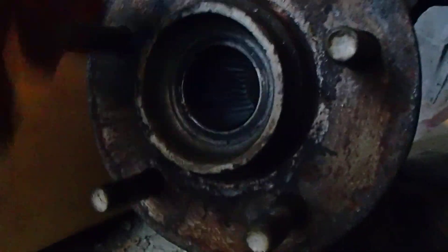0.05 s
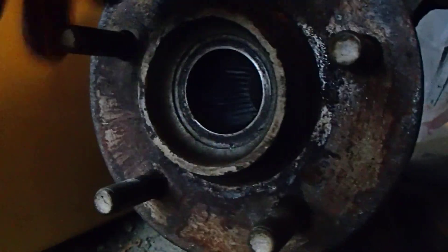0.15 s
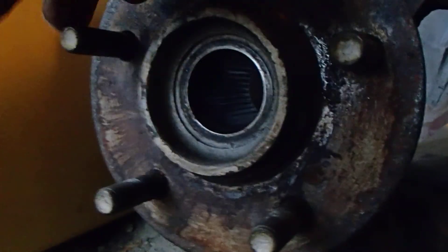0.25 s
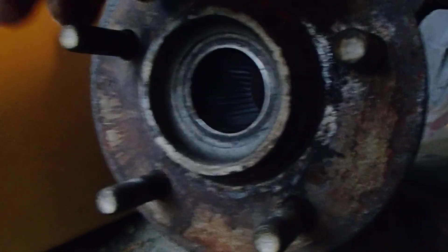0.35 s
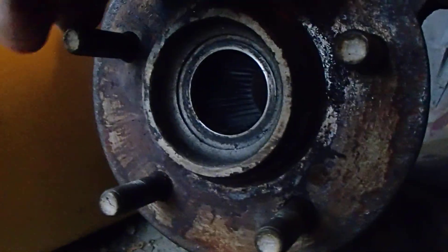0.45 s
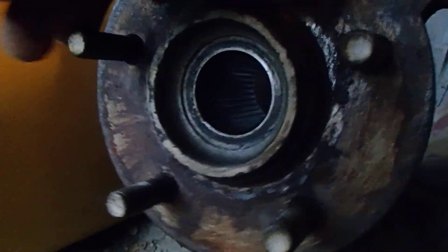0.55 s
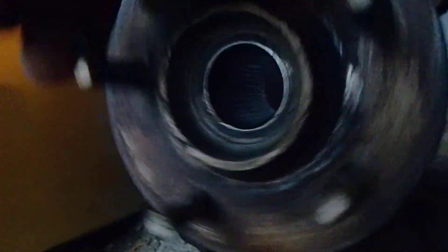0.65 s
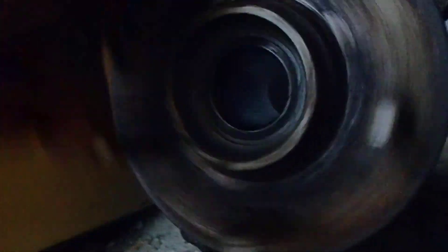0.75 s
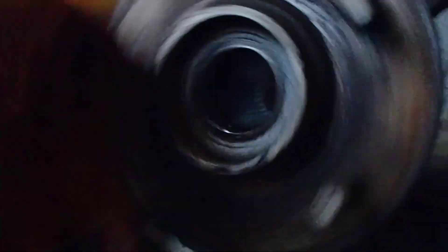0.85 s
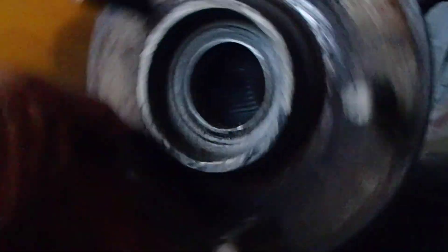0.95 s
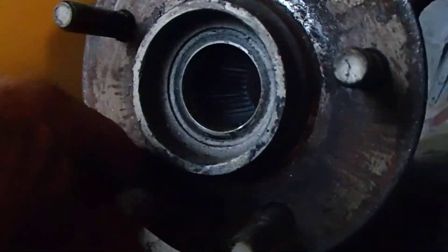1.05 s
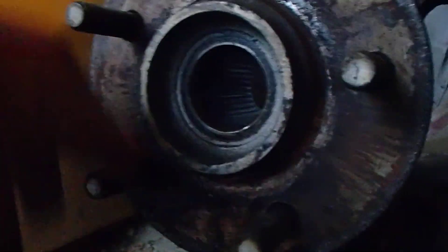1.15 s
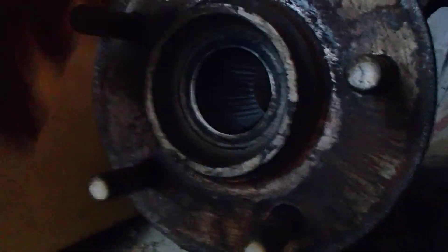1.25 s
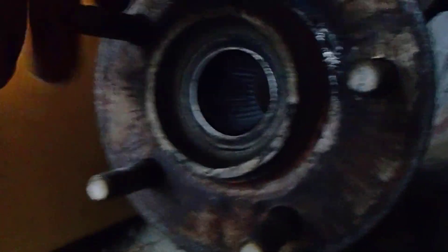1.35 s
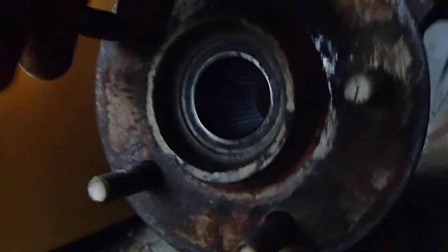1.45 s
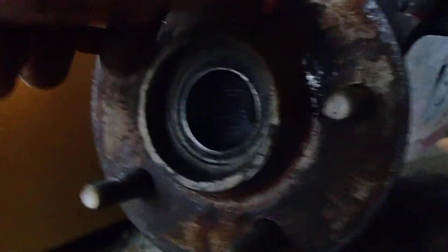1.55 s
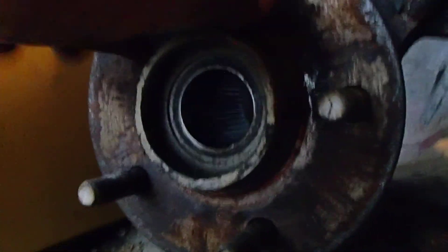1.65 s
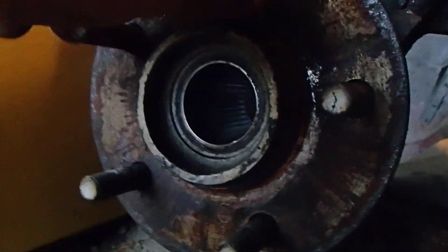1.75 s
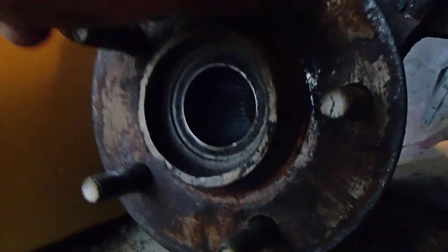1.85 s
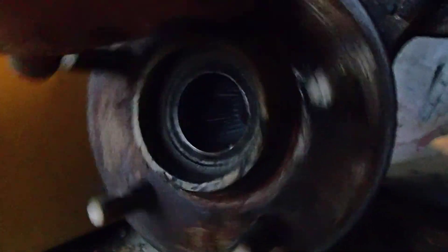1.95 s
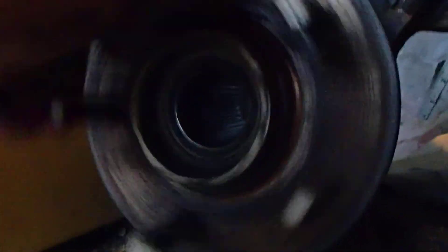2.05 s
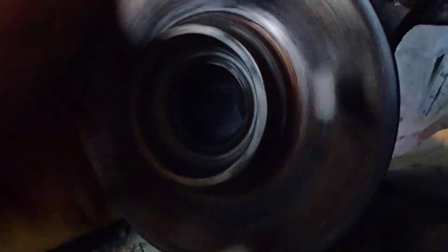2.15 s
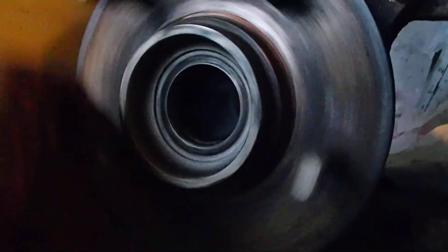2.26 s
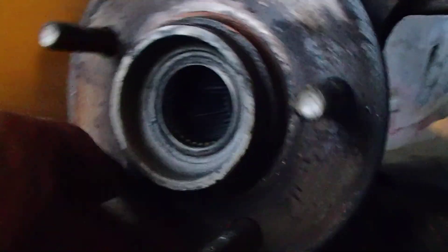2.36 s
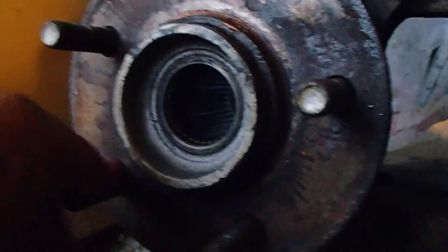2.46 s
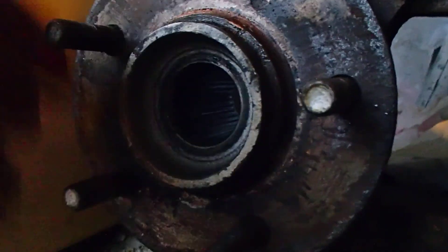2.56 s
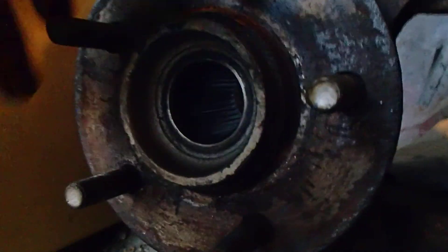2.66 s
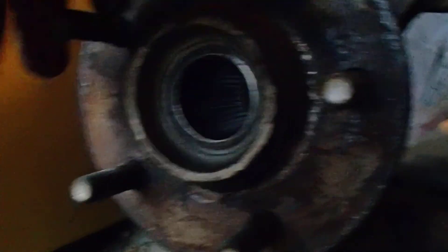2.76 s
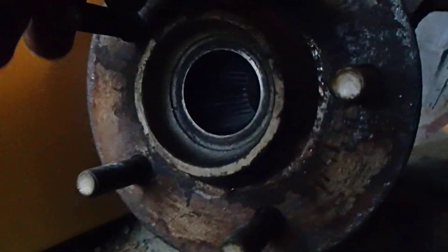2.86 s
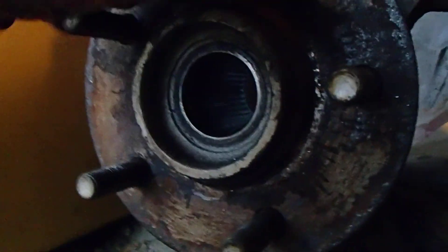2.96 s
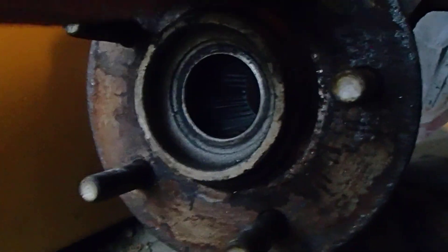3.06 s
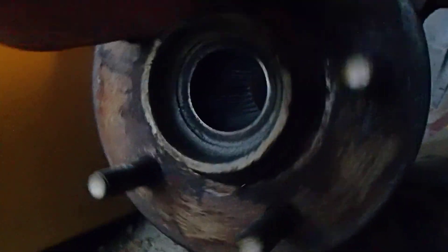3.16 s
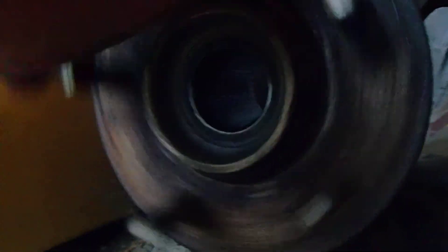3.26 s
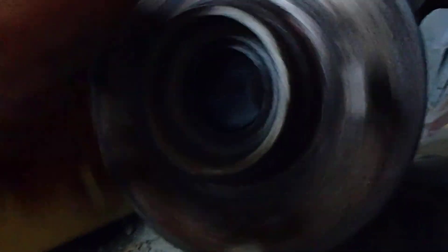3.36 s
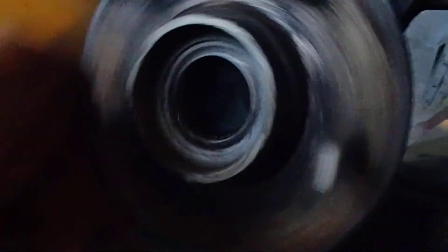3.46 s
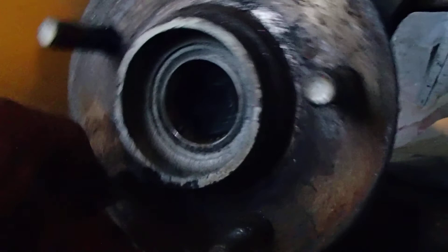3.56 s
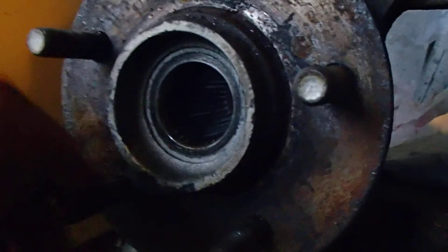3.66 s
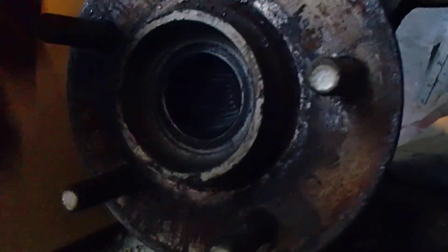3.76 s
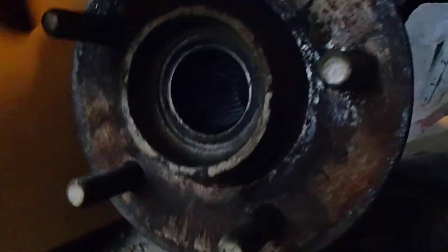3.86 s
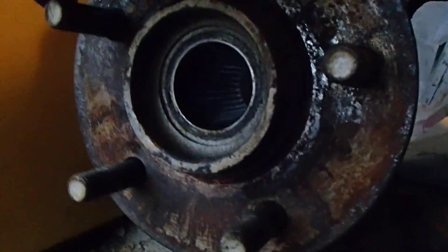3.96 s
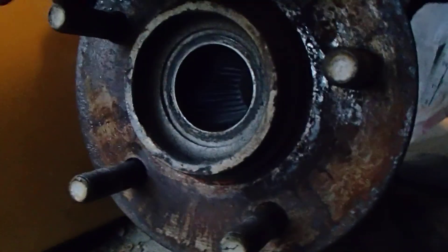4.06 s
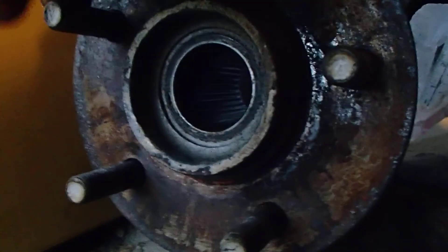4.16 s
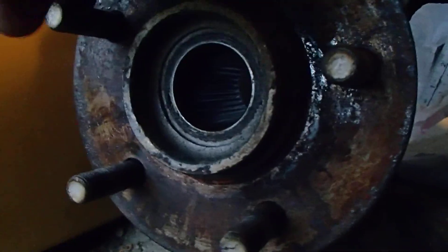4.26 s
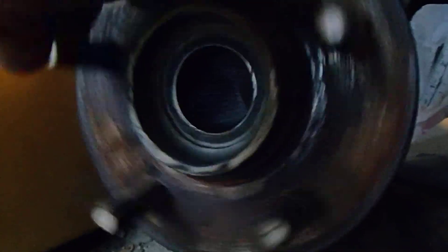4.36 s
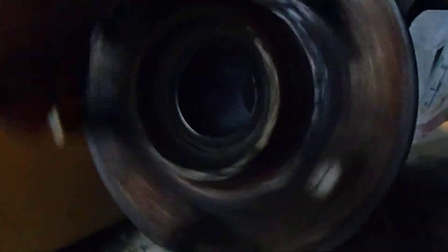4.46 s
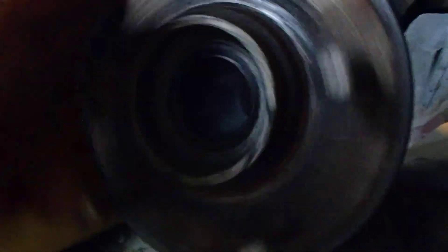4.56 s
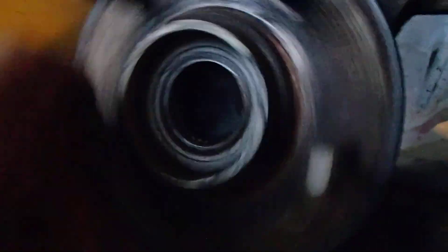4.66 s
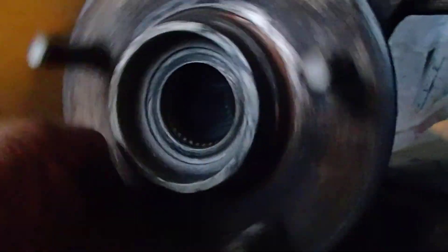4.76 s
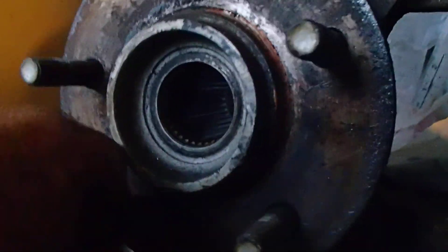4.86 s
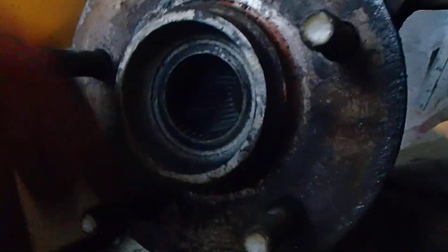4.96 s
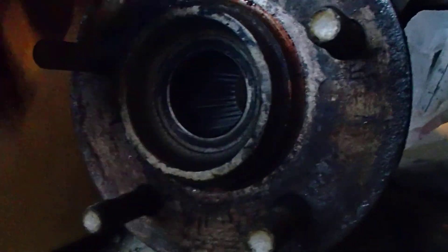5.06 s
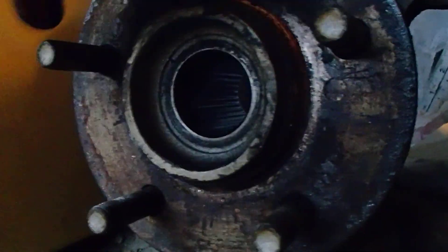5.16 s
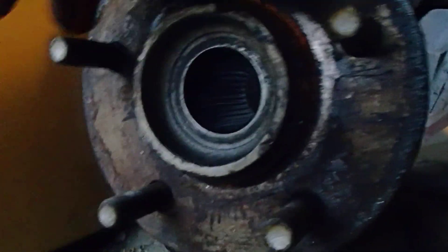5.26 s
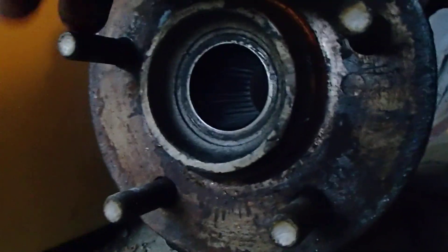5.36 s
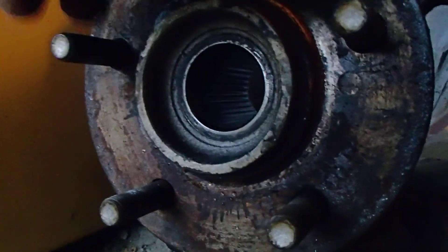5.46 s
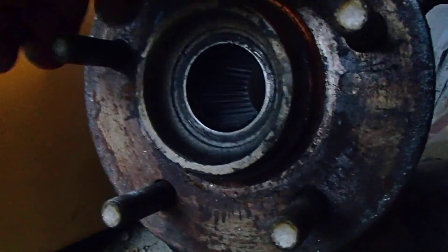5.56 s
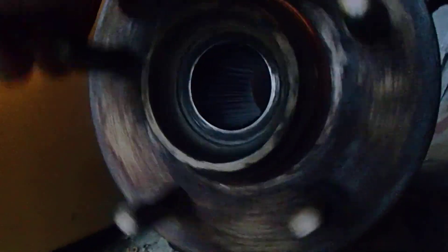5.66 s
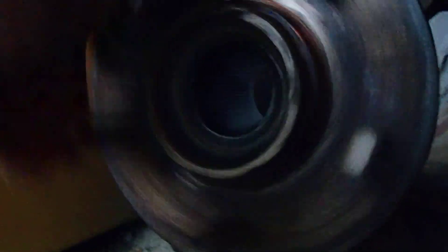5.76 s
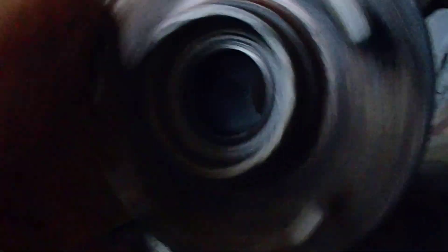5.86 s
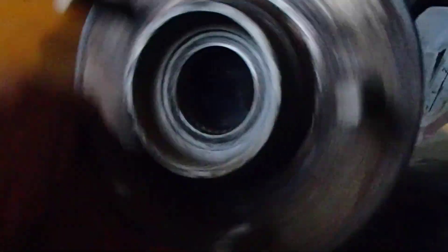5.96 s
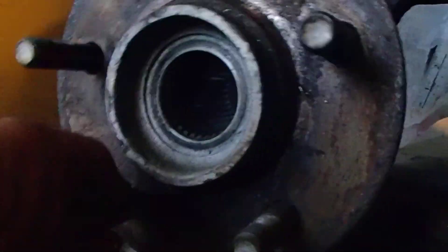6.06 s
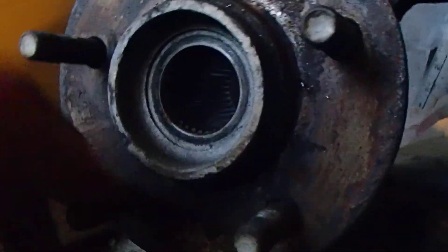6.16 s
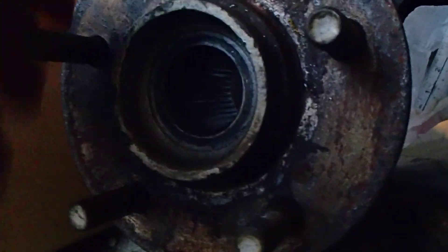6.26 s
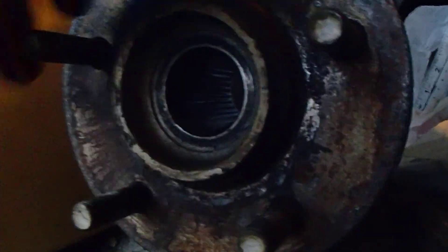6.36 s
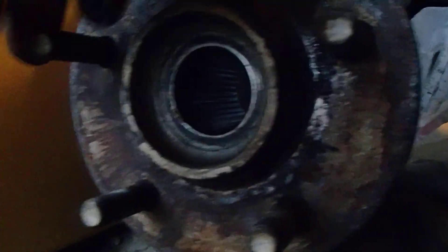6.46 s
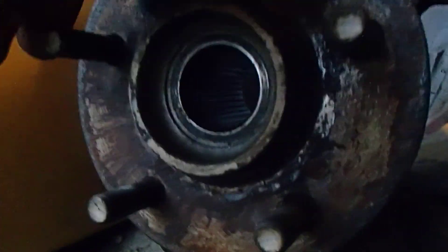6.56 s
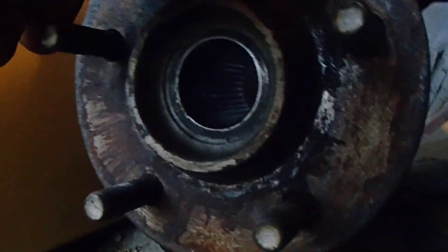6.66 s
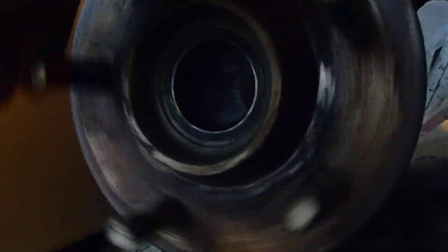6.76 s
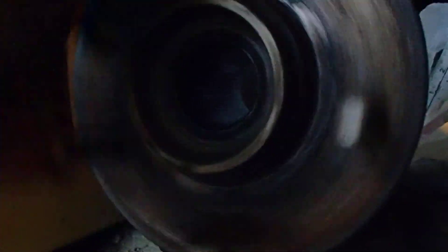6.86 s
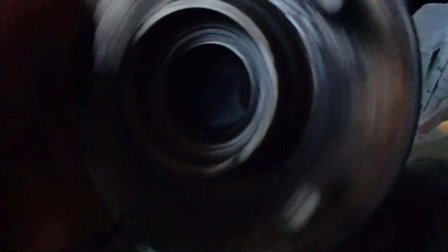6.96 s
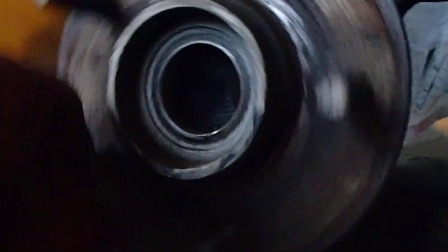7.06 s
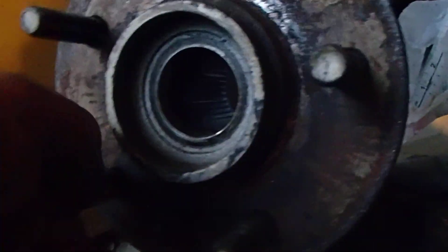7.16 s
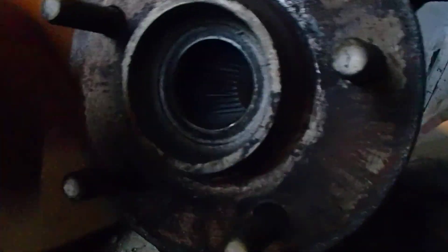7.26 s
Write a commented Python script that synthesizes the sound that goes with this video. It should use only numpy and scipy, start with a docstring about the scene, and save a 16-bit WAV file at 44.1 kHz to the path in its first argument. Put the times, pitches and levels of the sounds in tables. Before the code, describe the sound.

Sharp, uneven metallic clicks come in pairs, heard up close, as a worn wheel bearing is pushed round by hand six times. A low, gritty rolling sound runs under each push, and the clicks carry slight squeaks and leave the steel rim ringing briefly. Faint pings, dry brushing, a few soft knocks and two tiny late ticks are scattered through, over the steady hiss of a quiet room.

```python
"""A quiet room hisses, and close by the steel rim (flange) of a worn wheel hub sings faintly and pings.
Then a hand turns the hub in six short pushes, and its dry bearing rumbles and rustles.
In each push the balls catch twice on their pitted track: jolts chatter through the steel housing,
the slipping ball squeaks, and the flange rings on. The hub settles with soft pings.
Along the way come light brushing on rust, a few dull knocks and, late on, two ticks of a loose ball."""
import sys
import numpy as np
from scipy import signal
from scipy.fft import rfft, irfft, next_fast_len
from scipy.io import wavfile

SR = 44100
rng = np.random.default_rng(int(sys.argv[2]) if len(sys.argv) > 2 else 0)


def to_wav(sig):
    """Store sig (one row per channel, or 1-D mono) as 16-bit WAV at the path in sys.argv[1].

    Samples outside -1..1 are clipped; the rate is SR.
    """
    pcm = np.clip(np.atleast_2d(sig), -1, 1) * 32767
    pcm = np.round(pcm).astype(np.int16)
    wavfile.write(sys.argv[1], SR, pcm.T)  # frames by channels


N = 322371
TIME = np.arange(N) / SR

# Tone colour of the room's hiss: f/Hz, relative level/dB
HISS_SPECTRUM = [(20, -11.5), (60, -13.5), (130, -7.5), (230, -9.5), (340, -6), (490, -10), (620, -3),
                 (900, -2), (1350, -2.5), (1650, -5), (2100, -3), (2600, -6), (4200, -8), (4550, -13.5),
                 (6600, -20), (7300, -23), (9500, -24), (15000, -27)]
# The flange's modes (the notes it rings at), with a close pair that beats: f/Hz
FLANGE_PITCHES = [3316, 4159, 4172, 4737, 5546, 6602, 8205, 10146, 11150]
# For each of those modes: relative level/dB, free ring time/s (to fade by 60 dB)
FLANGE_MODES = [(4, 0.36), (1.5, 0.46), (-4, .55), (-20, .35), (5.5, 0.29), (2.5, 0.3), (-8, 0.49),
                (-7, 0.31), (-21, .3)]
# For each mode: its group (0-3), which picks one of the four levels of a strike
MODE_GROUPS = [0, 1, 1, 1, 2, 3, 3, 3, 3]
# Pings as the hub settles: t/s, level/dB for each of the four groups, ring time factor
SETTLING_PINGS = [(.104, -51, -47, -60, -63, .68), (.402, -47, -56, -55, -49, .47),
                  (.825, -38.5, -48, -53, -52, .54), (1.151, -54, -40.5, -47, -49, .7),
                  (1.526, -43, -46, -50, -49, .78), (3.675, -36.5, -30, -51, -51, .8),
                  (4.899, -42, -39, -48, -49, .7), (5.467, -60, -50, -58, -51, .38),
                  (6.068, -55, -49, -57, -61, 1.2), (7.136, -49, -59, -50, -62, .56)]
# Rumble of each push: level/dB
PUSH_LEVELS = [-51, -55, -47, -47.5, -47.5, -52.5]
# Tone colours of the bearing's rumble and of its gritty rustle: f/Hz, relative level/dB
RUMBLE_SPECTRUM = [(25, -45), (130, -12), (450, -20), (700, -1.5), (900, 4), (1150, 0), (1700, -4),
                   (3500, -11), (8000, -35)]
GRIT_SPECTRUM = [(1500, 5), (3400, 7), (4600, -7), (6400, -5.5), (8500, -15.5), (15000, -18)]
# A ball catches in a pit, twice a push: start t/s, far edge t/s, end t/s, drop level/dB,
# chatter level/dB, far edge level/dB, brightness/(dB per octave), pitch factor, squeak level/dB,
# ring level/dB for groups 0, 2 and 3, ring time factor. The levels are relative.
PIT_CATCHES = [(.692, .7115, .716, -11, -12.5, -8, -.5, .997, -5.5, -20.5, -38, -42, .44),
               (.880, .906, .912, -31, -25.5, -22, -2, 1.01, -2.5, -42, -50, -54, .3),
               (2.0583, 2.072, 2.079, -4.5, -19.5, -15.5, -.5, 1.008, 0, -24, -52, -39, .43),
               (2.2378, 2.2555, 2.274, -22, -24, -20, -2, 1.018, -.5, -33, -58, -56, .17),
               (3.2705, 3.2815, 3.286, -11, -15.5, -8, 0, 1.003, 2, -33.5, -47, -44, .33),
               (3.4275, 3.4513, 3.464, -15, -20, -15.5, -5, 1.022, -2, -17, -41, -39, .22),
               (4.4507, 4.463, 4.469, -15, -15.5, -10, -1.5, 1.003, -4.5, -23.5, -50, -44, .53),
               (4.6305, 4.6515, 4.657, -6.5, -13.5, -9.5, -.5, 1.004, -4, -21, -46, -41, .19),
               (5.7232, 5.7305, 5.74, -16, -15.5, -6.5, -1.5, .995, -3, -30, -42, -45, .4),
               (5.8845, 5.8985, 5.904, -14, -13.5, -10.5, .5, .99, -4.5, -33, -42, -41, .38),
               (6.8045, 6.821, 6.829, -15, -11.5, -5.5, -.5, .982, -5, -37, -41, -32, .39),
               (6.9815, 7.003, 7.009, -24, -23, -11.5, -2, 1.002, -5.5, -25, -41, -38, .21)]
# Quickly fading modes of the housing: f/Hz, width/Hz, relative level/dB
HOUSING_MODES = [(2100, 350, -21), (2494, 86, -10.5), (2820, 314, -9), (3015, 173, -6.5), (3302, 82, -2),
                 (3670, 320, -10), (3906, 134, -6.5), (5023, 330, -10), (5364, 210, -7.5), (6185, 150, -4),
                 (6340, 325, -5), (6845, 260, -11), (7390, 180, -13), (7646, 170, -14), (8050, 110, -18),
                 (9100, 220, -24.5), (9500, 130, -28), (10240, 210, -25.5), (10900, 300, -37),
                 (11450, 160, -34), (13300, 500, -43)]
# Hollows between the housing's clusters of modes: f/Hz, width/Hz, level/dB
HOUSING_DIPS = [(4480, 540, -8.5), (5900, 280, -10), (8470, 350, -5)]
# Notes that a sticking and slipping ball excites: f/Hz, relative level/dB, wander/Hz
SQUEAK_MODES = [(3535, -2, 58), (6150, -12, 80)]
# Light, dry brushing on the rusty steel: start t/s, end t/s, level/dB
BRUSH_STROKES = [(.788, .882, -52), (1.51, 1.572, -56), (3.54, 3.602, -55), (4.79, 4.945, -56),
                 (5.455, 5.476, -50), (6.027, 6.094, -57), (6.992, 7.19, -56)]
# Tone colour of the brushing: f/Hz, relative level/dB
BRUSH_SPECTRUM = [(2000, -16), (6000, 5), (9000, -8), (14000, -2), (16000, -6)]
# Dull knocks of the hub: t/s, relative level/dB, fade time/s
HUB_KNOCKS = [(1.675, -41, 0.023), (2.058, -43, 0.0079), (3.3245, -37.5, 0.0054), (5.868, -36, 0.0083),
              (6.816, -45, 0.04)]
# Tone colour of the knocks: f/Hz, relative level/dB
KNOCK_SPECTRUM = [(25, -40), (150, -14), (500, -13), (850, 0.5), (1100, -0.5), (1500, -9.5), (3500, -3.5),
                  (6500, -20), (11000, -40)]
# Stray ticks of a loose ball: t/s, level/dB
BALL_TICKS = [(4.590, -34), (6.931, -46)]


def from_db(db):
    """Turn decibels into a factor to multiply by."""
    return 10 ** (np.asarray(db) / 20)


def add(out, s, sound):
    """Mix a sound in, starting at s seconds."""
    at = int(round(s * SR))
    out[at:at + len(sound)] += sound[:N - at]


def coloured(x, spectrum):
    """Give a signal a tone colour, then scale it to a typical size (rms) of 1."""
    hz, db = np.transpose(spectrum)
    size = next_fast_len(N)
    log_hz = np.log(np.maximum(np.fft.rfftfreq(size, 1 / SR), 1))
    gain = from_db(np.interp(log_hz, np.log(hz), db))
    shaped = irfft(rfft(x, size) * gain, size)[:N]
    return shaped / np.std(shaped)


def grains(size, per_s, spread_db):
    """Tiny random clicks of uneven strength, scaled to an rms of 1."""
    clicks = (rng.random(size) < per_s / SR) * rng.standard_normal(size)
    clicks *= from_db(spread_db * rng.standard_normal(size))
    return clicks / (np.std(clicks) + 1e-12)


def drift(size, rate):
    """A value that glides to a new random number rate times a second."""
    steps = np.arange(size) * rate / SR
    targets = rng.standard_normal(int(steps[-1]) + 2)
    return np.interp(steps, np.arange(len(targets)), targets)


def resonate(x, hz, width):
    """Let a signal ring at one pitch, with a gain of 1 at that pitch."""
    r = np.exp(-np.pi * width / SR)
    feedback = [1, -2 * r * np.cos(2 * np.pi * hz / SR), r * r]
    return signal.lfilter(np.array([1, 0, -1]) * (1 - r * r) / 2, feedback, x)


def stroke(start, end):
    """A movement that speeds up and slows down again."""
    return np.sin(np.pi * np.clip((TIME - start) / (end - start), 0, 1))


def pushes():
    """Start times of the first and second catch of each push."""
    starts = [row[0] for row in PIT_CATCHES]
    return list(zip(starts[::2], starts[1::2]))


def room_hiss(level_db=-46):
    """The room hisses evenly throughout."""
    return from_db(level_db) * coloured(rng.standard_normal(N), HISS_SPECTRUM)


def singing(steady_db=-62, swell_db=-58, fade_s=.4, width_hz=14, mode_db=(-6, -6, -15, -24, -14)):
    """Tiny contacts keep the lower flange modes just sounding, most as the hub coasts after a push."""
    contacts, out = grains(N, per_s=150, spread_db=3.5), 0
    for hz, db in zip(FLANGE_PITCHES, mode_db):
        mode = resonate(contacts + 1e-18, hz, width_hz)
        out += from_db(db) * mode / np.std(mode)
    coasting = sum((TIME > second) * np.exp(-np.abs(TIME - second) / fade_s) for _, second in pushes())
    return out * (from_db(steady_db) + from_db(swell_db) * coasting)


def flange_ring(strike_db, ring_factor, rise_s, top_hz, detune_hz=4):
    """Pure notes whose balance depends on where the ball strikes; the hand can shorten the ring."""
    out, t = 0, TIME[:SR // 2]
    shift_hz = detune_hz * rng.standard_normal()   # the load on the hub pulls the pitch a little
    for hz, group, (db, ring_s) in zip(FLANGE_PITCHES, MODE_GROUPS, FLANGE_MODES):
        gain = from_db(db + strike_db[group]) / (1 + (hz / top_hz) ** 8)
        fade = np.exp(-np.log(1000) * t / (ring_s * ring_factor))
        out += gain * fade * np.sin(2 * np.pi * (hz + shift_hz) * t)
    return out * (1 - np.exp(-t / rise_s))


def pings():
    """The hub settles and the flange pings, with a gentle start and a mellow tone."""
    out = np.zeros(N)
    for s, *strike_db, ring_factor in SETTLING_PINGS:
        add(out, s, flange_ring(strike_db, ring_factor, rise_s=.005, top_hz=9800))
    return out


def room_echo(x, echo_db=-23, fade_60db_s=.17, gap_s=.0045):
    """The room adds a faint, short wash of echoes."""
    t = TIME[:SR // 3]
    echoes = rng.standard_normal(len(t)) * np.exp(-np.log(1000) * t / fade_60db_s) * (t > gap_s)
    return x + from_db(echo_db) * signal.fftconvolve(x, echoes / np.linalg.norm(echoes))[:N]


def rolling(uneven_db=2, grit_db=-52.5, lead_s=.08, coast_s=.11):
    """During each push the balls rumble and rustle along their dry track."""
    bumps = grains(N, per_s=900, spread_db=2) * from_db(uneven_db * drift(N, rate=70))
    rumble = coloured(bumps, RUMBLE_SPECTRUM)
    rustle = from_db(grit_db) * coloured(grains(N, per_s=7000, spread_db=6.5), GRIT_SPECTRUM)
    return sum(stroke(first - lead_s, second + coast_s) * (from_db(db) * rumble + rustle)
               for (first, second), db in zip(pushes(), PUSH_LEVELS))


def catches(grind_db=6, drag_db=-10, ramp_s=.00051, drop_s=.0022, lesser_db=-2, clear_s=.002,
            jolt_db=27, crush_db=-11, crush_s=.0009, skid_rise_s=.00088, skid_s=.0023):
    """A grinding ball drops into a pit, chatters across it and strikes the far edge."""
    out, t = np.zeros(N), TIME[:SR // 10]
    for start, edge, end, drop_db, chatter_db, edge_db, bright_db, pitch, squeak_db, *_ in PIT_CATCHES:
        contact = from_db(chatter_db) * np.clip(np.minimum(t, end - start - t) / ramp_s, 0, 1)
        force = from_db(grind_db) * contact * grains(len(t), per_s=9000, spread_db=3.5)
        slip = from_db(drag_db) * contact
        grit = rng.standard_normal(len(t))
        jolts = [(drop_s, drop_db), (edge - start, edge_db)]
        jolts += chatter(drop_s, end - start - clear_s, chatter_db + lesser_db)
        for s, db in jolts:
            at = int(round(s * SR))
            after = t[:len(t) - at]
            # a jolt is one sharp blow that crushes some grit and lets the ball skid
            blow = from_db(crush_db) * grit[at:] * np.exp(-after / crush_s)
            blow[0] = 1
            force[at:] += from_db(db + jolt_db) * blow
            slip[at:] += from_db(db) * 2 * (1 - np.exp(-after / skid_rise_s)) * np.exp(-after / skid_s)
        add(out, start, housing(force, bright_db, pitch) + from_db(squeak_db) * squeak(slip, pitch))
    return out


def housing(force, bright_db, pitch, crack_db=-47):
    """Thick steel answers a blow with a bare crack and notes that die quickly."""
    sound = from_db(crack_db) * force
    for k, (hz, width, db) in enumerate(HOUSING_MODES):
        gain = from_db(db + bright_db * np.log2(hz / 3500))
        sound += (-1) ** k * gain * resonate(force, hz * pitch, width)
    for hz, width, db in HOUSING_DIPS:
        sound -= (1 - from_db(db)) * resonate(sound, hz * pitch, width)
    return sound


def squeak(slip, pitch):
    """Rubbing drives two unsteady notes for as long as the ball slips."""
    out = 0
    for hz, db, wander_hz in SQUEAK_MODES:
        unsteady_hz = hz * pitch + wander_hz * drift(len(slip), rate=500)
        out += from_db(db) * np.sin(2 * np.pi * np.cumsum(unsteady_hz) / SR)
    return slip * out


def chatter(from_s, until_s, db, gap_s=.004, jitter=.3, spread_db=1.5, count=14):
    """Small, unevenly spaced jolts as the ball crosses the pit: a list of t/s, level/dB."""
    times = from_s + np.cumsum(gap_s * np.exp(jitter * rng.standard_normal(count)))
    levels = db + spread_db * rng.standard_normal(count)
    return [(s, level) for s, level in zip(times, levels) if s < until_s]


def edge_rings(group1_db=-49):
    """Hitting a pit's far edge sets the flange ringing, but barely stirs mode group 1."""
    out = np.zeros(N)
    for _, edge, *_, group0_db, group2_db, group3_db, ring_factor in PIT_CATCHES:
        strike_db = (group0_db, group1_db, group2_db, group3_db)
        add(out, edge, flange_ring(strike_db, ring_factor, rise_s=.002, top_hz=14000))
    return out


def brushing(scuff_s=.032, scuff_db=-50):
    """Fine rust rustles under a light touch, and scuffs just before each push's second catch."""
    rust = coloured(grains(N, per_s=4000, spread_db=2), BRUSH_SPECTRUM)
    scuffs = from_db(scuff_db) * sum(stroke(second - scuff_s, second) for _, second in pushes())
    touches = sum(from_db(db) * stroke(start, end) for start, end, db in BRUSH_STROKES)
    return rust * (scuffs + touches)


def knocks(rise_s=.0014):
    """The hub knocks softly under the hand, in short, dull bursts of noise."""
    level, t = np.zeros(N), TIME[:SR // 5]
    for s, db, fade_s in HUB_KNOCKS:
        add(level, s, from_db(db) * 2 * (1 - np.exp(-t / rise_s)) * np.exp(-t / fade_s))
    return level * coloured(rng.standard_normal(N), KNOCK_SPECTRUM)


def ticks(hz=6250, peak_s=.0007):
    """A loose ball taps out one high, very short note."""
    out, t = np.zeros(N), TIME[:SR // 50]
    tick = t / peak_s * np.exp(1 - t / peak_s) * np.sin(2 * np.pi * hz * t)
    for s, db in BALL_TICKS:
        add(out, s, from_db(db) * tick)
    return out


def scene():
    """The hub heard close by, in one channel; only the struck sounds echo."""
    struck = room_echo(catches() + edge_rings() + pings() + ticks())
    return (struck + singing() + rolling() + brushing() + knocks() + room_hiss())[None]


def record(dry, cutoff_hz=15600):
    """A steep filter cuts off the highest treble."""
    return signal.sosfilt(signal.ellip(10, .1, 70, cutoff_hz, fs=SR, output="sos"), dry)


dry = scene()
out = record(dry)
to_wav(out)
```